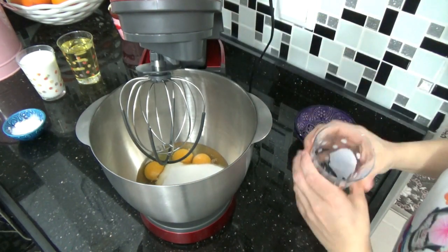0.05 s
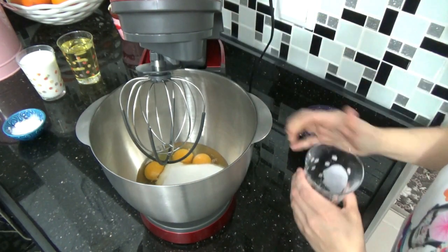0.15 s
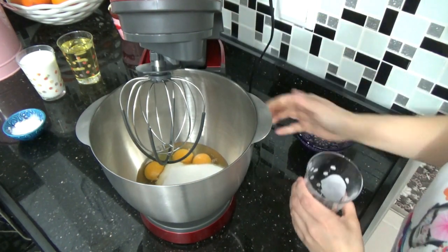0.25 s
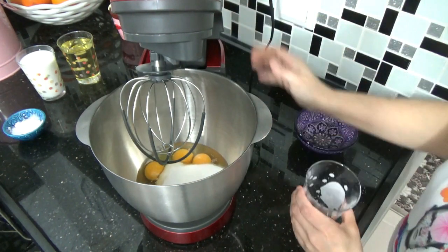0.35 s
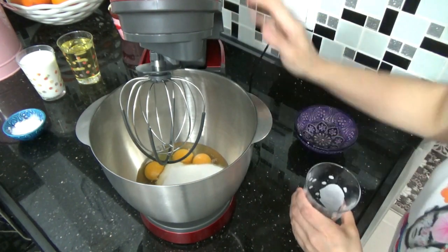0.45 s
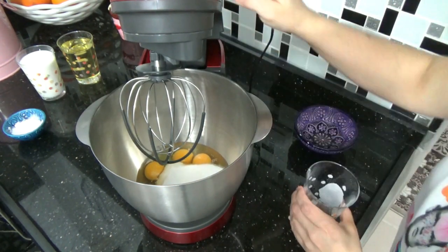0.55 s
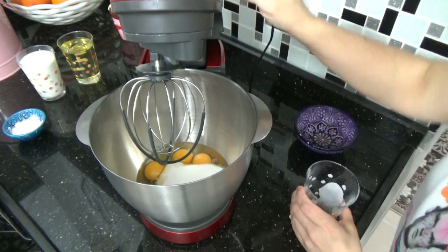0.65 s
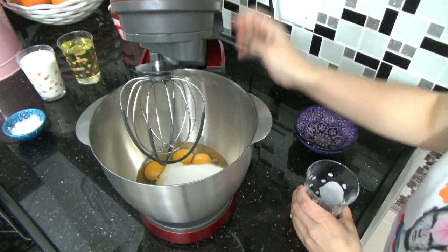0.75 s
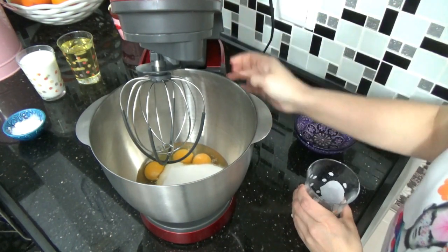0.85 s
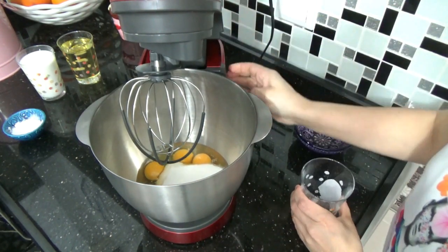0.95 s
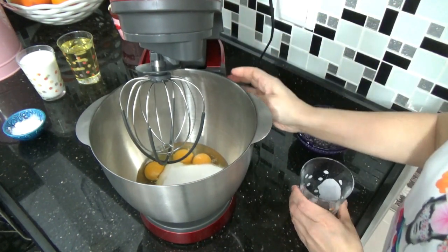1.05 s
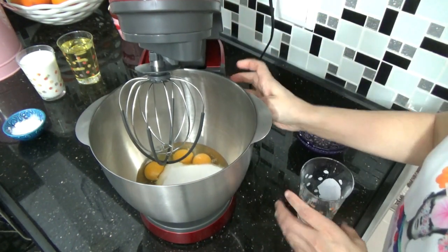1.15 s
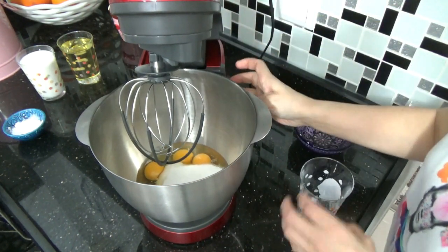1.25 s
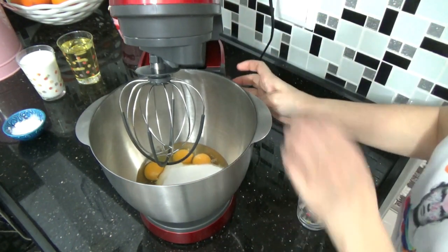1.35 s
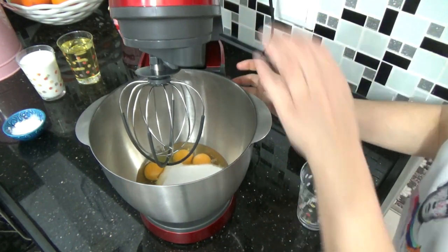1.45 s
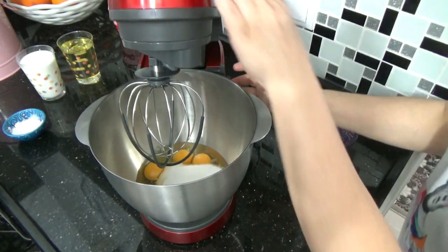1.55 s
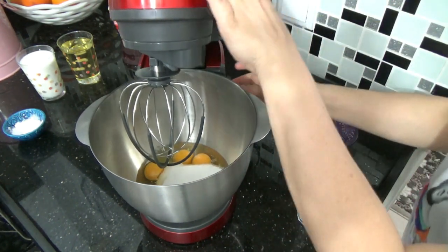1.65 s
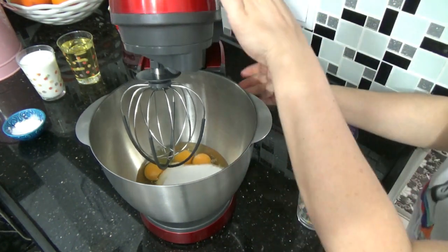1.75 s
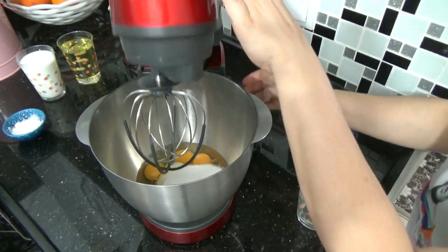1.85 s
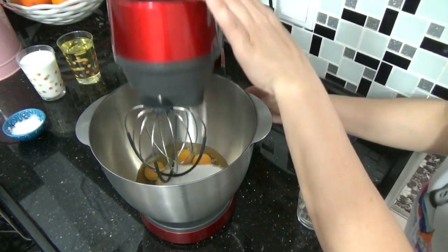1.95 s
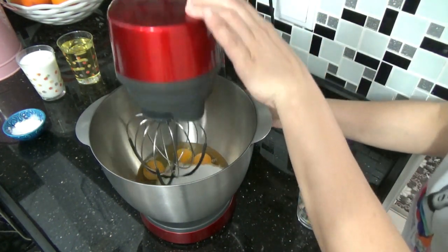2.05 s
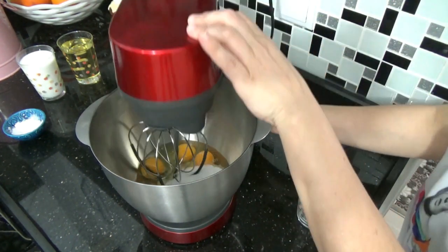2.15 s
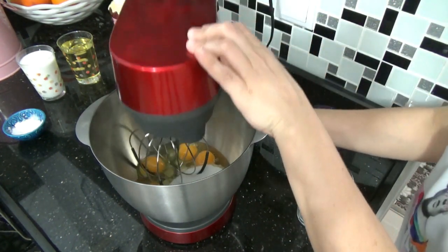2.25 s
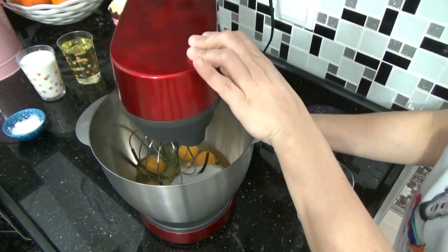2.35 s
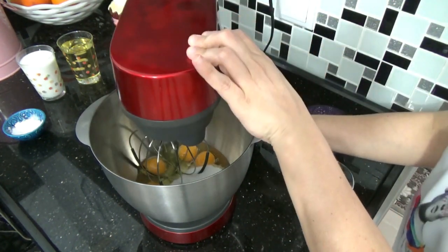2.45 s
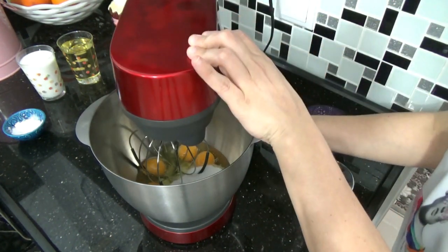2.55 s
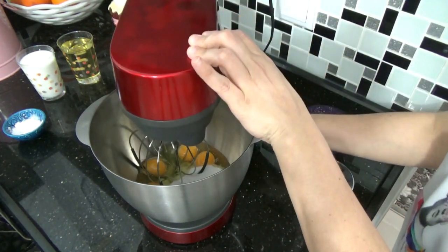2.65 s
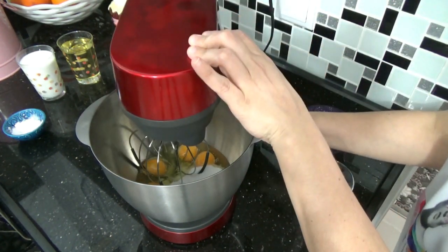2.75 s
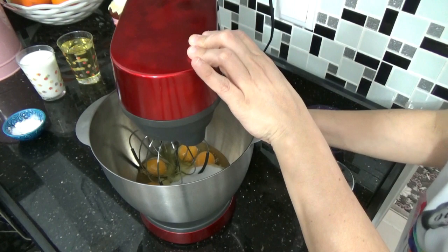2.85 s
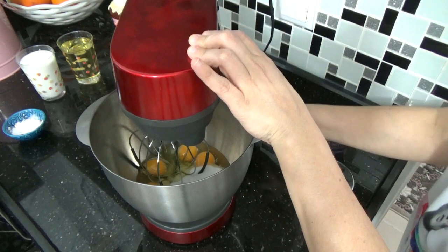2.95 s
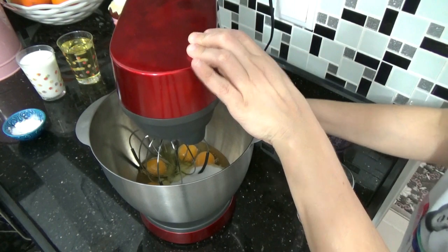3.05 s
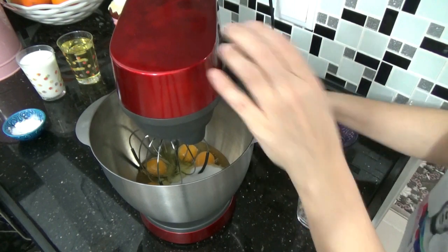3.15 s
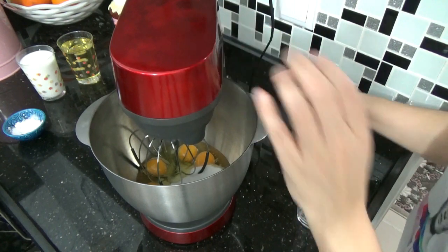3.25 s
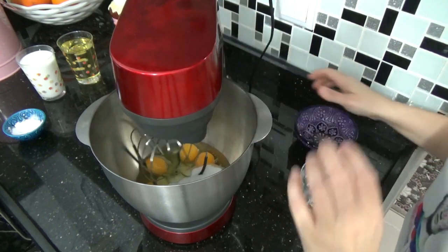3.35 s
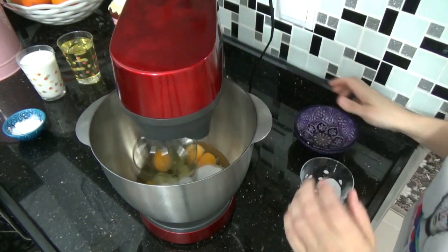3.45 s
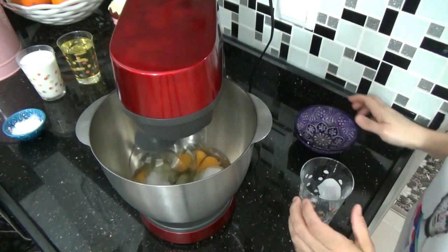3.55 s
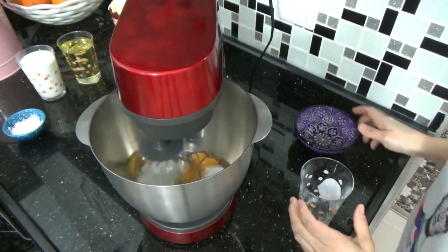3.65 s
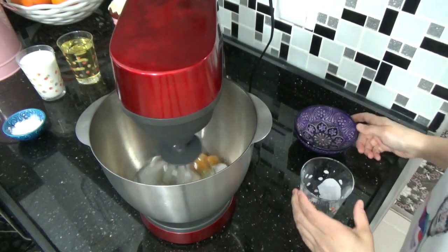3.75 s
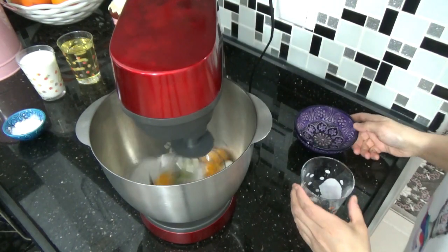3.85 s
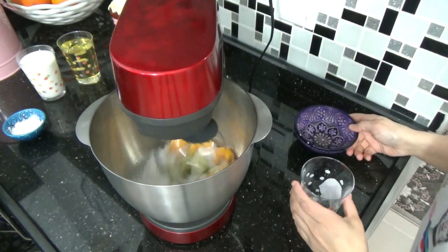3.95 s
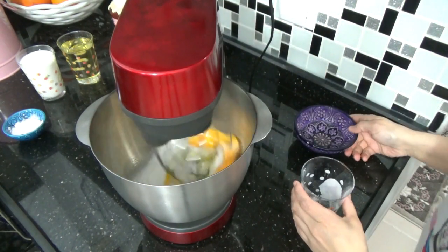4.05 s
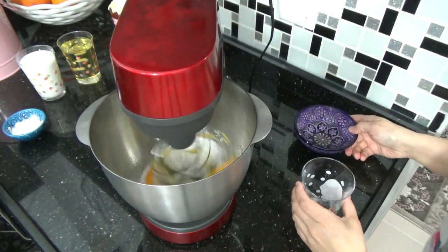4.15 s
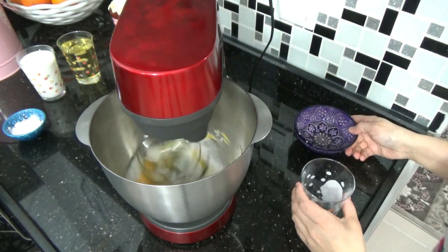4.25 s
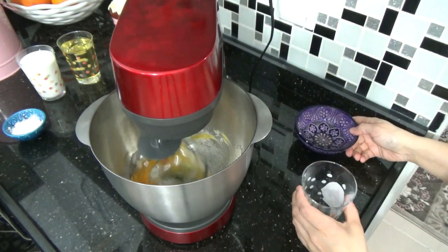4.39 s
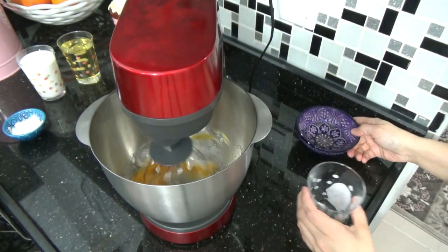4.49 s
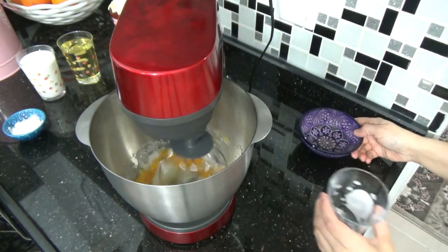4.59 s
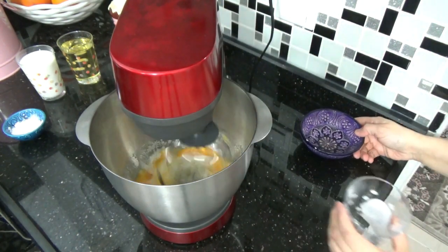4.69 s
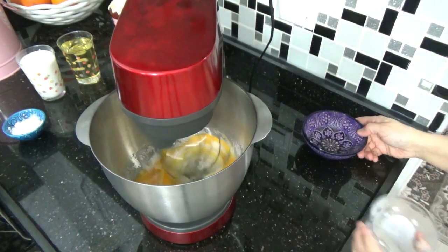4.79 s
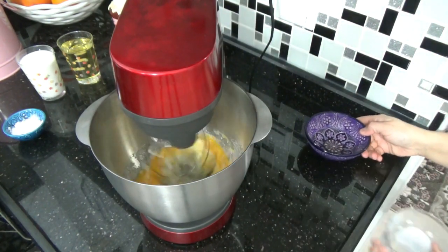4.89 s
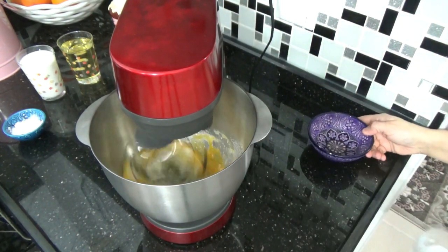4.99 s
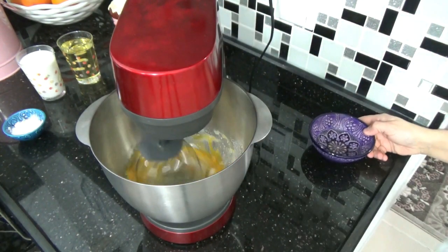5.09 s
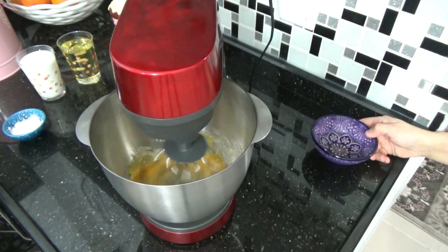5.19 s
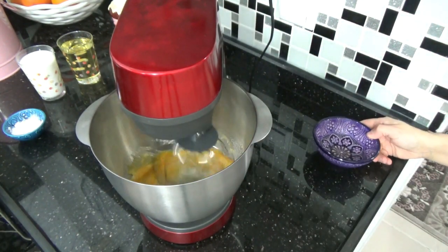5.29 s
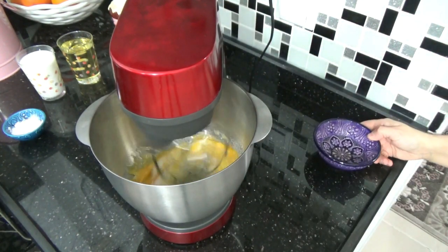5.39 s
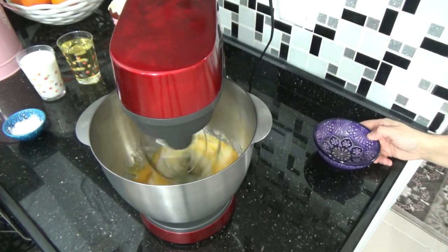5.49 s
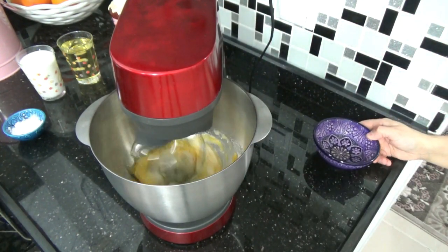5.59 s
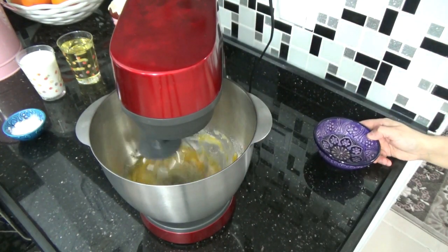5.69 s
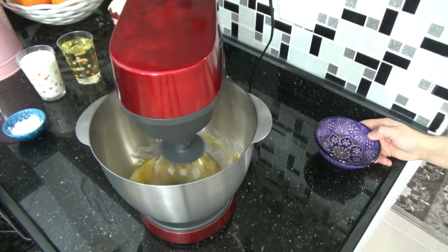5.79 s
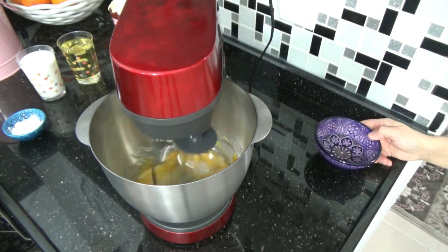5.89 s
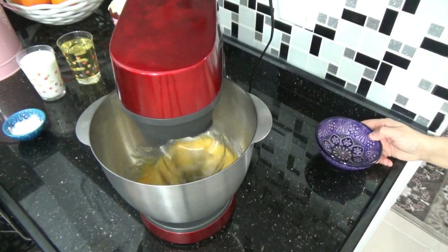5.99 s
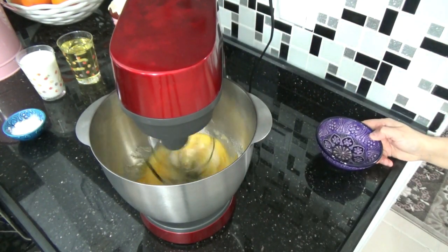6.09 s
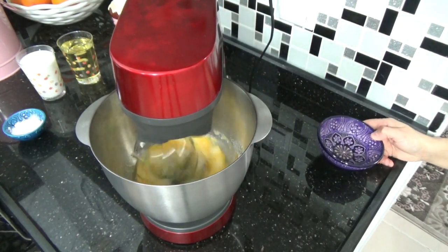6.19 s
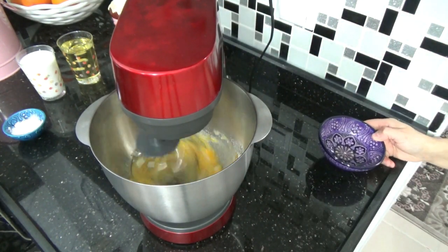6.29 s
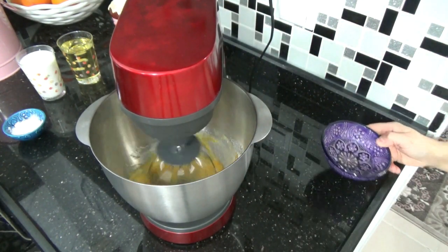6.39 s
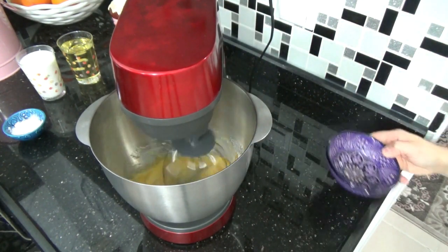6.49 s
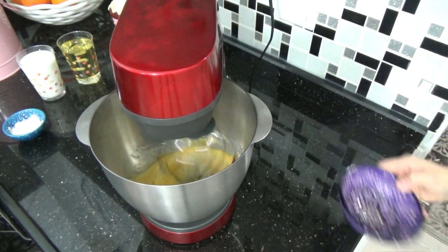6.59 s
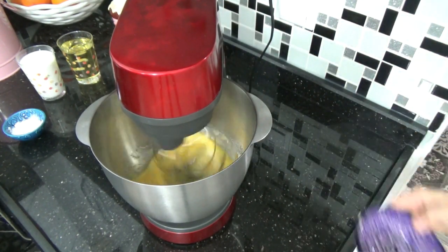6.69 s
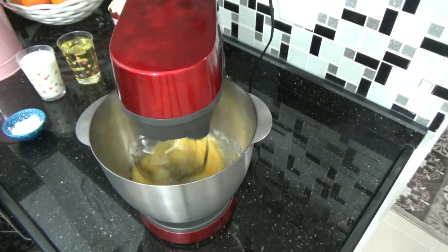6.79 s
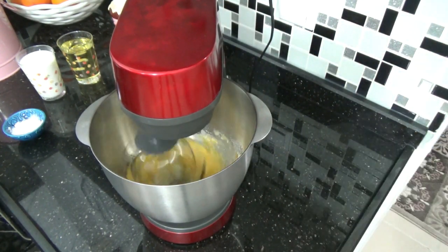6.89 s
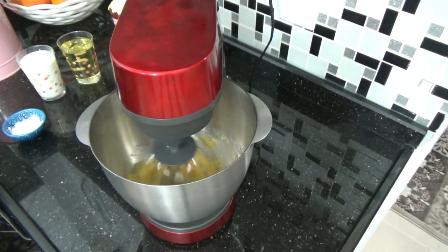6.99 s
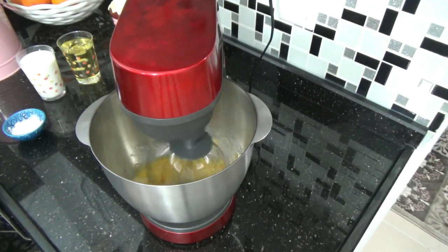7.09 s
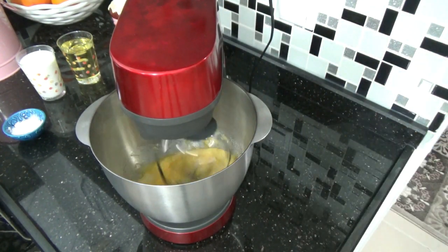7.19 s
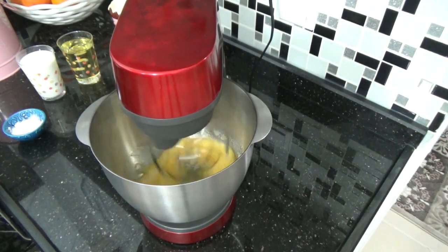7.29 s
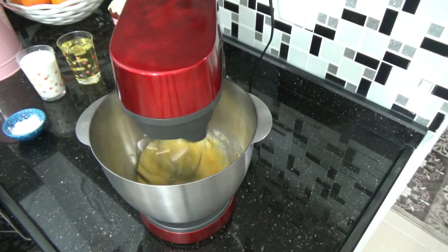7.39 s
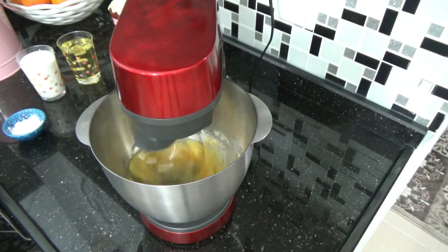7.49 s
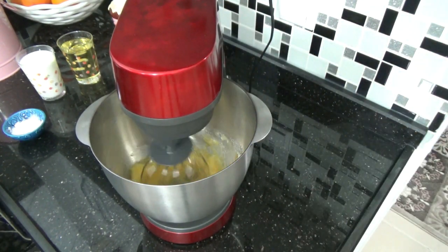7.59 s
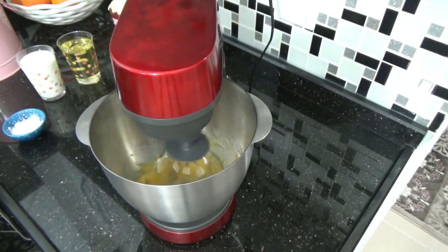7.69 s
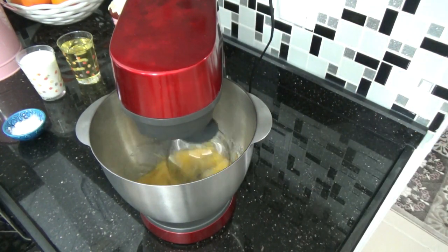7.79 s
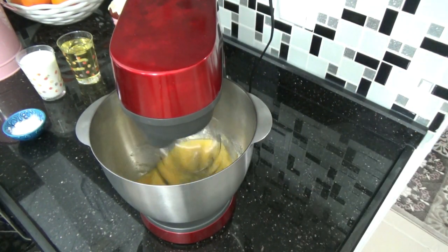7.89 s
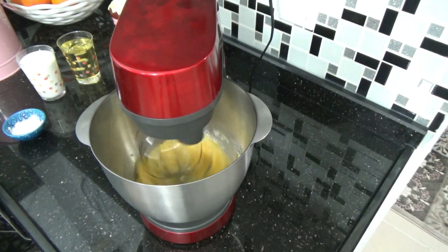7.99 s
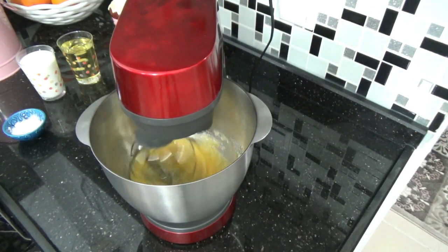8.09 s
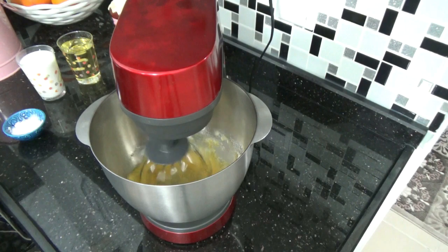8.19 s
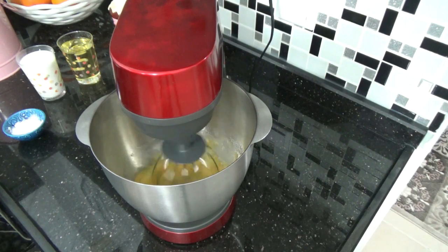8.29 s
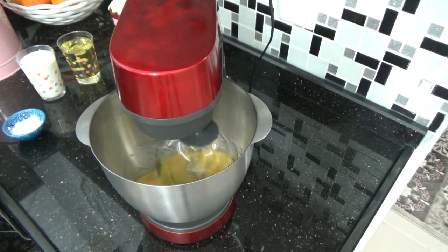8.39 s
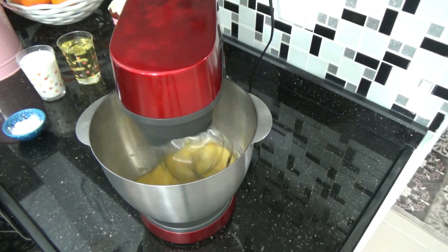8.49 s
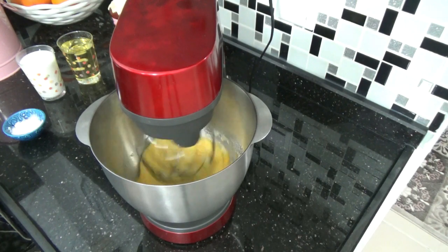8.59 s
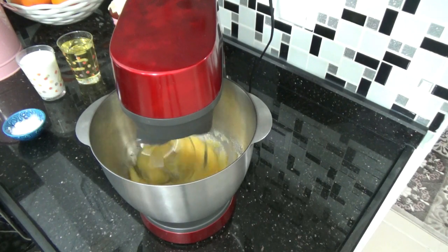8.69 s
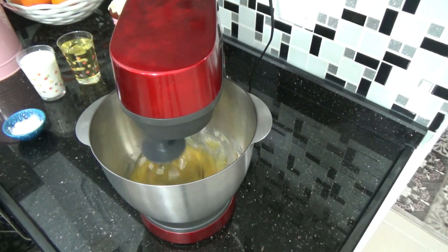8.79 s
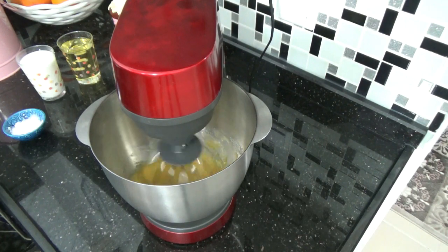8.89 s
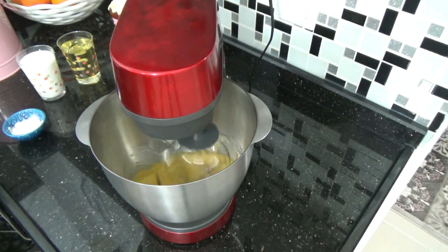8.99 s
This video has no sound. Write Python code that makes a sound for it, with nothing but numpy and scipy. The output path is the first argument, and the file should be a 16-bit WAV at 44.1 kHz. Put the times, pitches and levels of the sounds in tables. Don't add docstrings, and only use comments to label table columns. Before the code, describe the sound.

In a tiled kitchen, a mixer head is rapped, latched and dropped, then its geared motor surges up and whines on continuously, whisk crunching sugar at first.

```python
import sys
import numpy as np
from scipy import signal
from scipy.fft import rfft, irfft, next_fast_len
from scipy.io import wavfile
from scipy.ndimage import uniform_filter1d, map_coordinates

SR = 44100
rng = np.random.default_rng(int(sys.argv[2]) if len(sys.argv) > 2 else 0)


def natural_amplitude(level_db):
    exponent = np.asarray(level_db, float) / 20
    return 10 ** exponent


def file_out(sig):
    cols = np.atleast_2d(sig).T
    lim = np.clip(cols, -1, 1)
    pcm = np.round(lim * 32767).astype(np.int16)
    wavfile.write(sys.argv[1], SR, pcm)


N = 398663
NOW = np.arange(N) / SR
MAINS_HZ = 50
PLANET, WHEEL = 10 / 11, .13
OPPOSITE = np.array([[1], [-1]])


def unit(x):
    return x / np.sqrt(np.mean(x ** 2) + 1e-20)


def along(points, hz):
    f, v = np.transpose(points)
    return np.interp(np.log(hz + 1), np.log(f + 1), v)


def curve(rows):
    s, value = np.transpose(rows)
    return np.interp(NOW, s, value)


def wobble(rate):
    knots = rng.standard_normal(int(N * rate / SR) + 4)
    return map_coordinates(knots, [np.arange(N) * rate / SR], order=1)


def filtered(x, response):
    m = next_fast_len(x.shape[-1] + 8192)
    return irfft(rfft(x, m) * response(np.fft.rfftfreq(m, 1 / SR)), m)[..., :x.shape[-1]]


def bump(hz, centre, width):
    return np.exp(-((hz - centre) / width) ** 2)


def rush(spectrum, alike, patchy_db):
    z = signal.stft(rng.standard_normal((2, N)), nperseg=512)[2]
    field = uniform_filter1d(rng.standard_normal(z.shape[1:]), 5, 0)
    patches = natural_amplitude(patchy_db * unit(uniform_filter1d(field, 12, 1)))
    pair = signal.istft(z * patches, nperseg=512)[1][:, :N]

    def spread(hz):
        turn = np.arccos(np.clip(along(alike, hz), -1, 1)) / 2
        return natural_amplitude(along([(0.8, -120)] + spectrum, hz)) * [np.cos(turn), np.sin(turn)]

    mid, side = filtered(pair, spread)
    return unit(np.array([mid + side, mid - side]))


def tone(angle, db, drift_db, rate):
    shift = rng.normal(0, 0.16) * OPPOSITE
    level = natural_amplitude(db + drift_db * wobble(rate))
    return np.sqrt(2) * level * np.sin(angle + rng.uniform(0, 2 * np.pi) + shift)


def humps(rows):
    return sum(natural_amplitude(db) * np.exp(-((NOW - s) / length) ** 2) for s, db, length in rows)


# f/Hz, left-right likeness
ALIKE = [(60, 0.2), (150, 0.99), (380, 0.83), (950, 0.74), (2380, 0.83), (5980, 0.97), (15000, 0.79)]


def swells(rows, spectrum, grain_db, patchy_db):
    return humps(rows) * natural_amplitude(grain_db * wobble(300)) * rush(spectrum, ALIKE, patchy_db)


def ringing(modes, t):
    modes_sum = sum(natural_amplitude(level + rng.normal(0, 1.9) - 60 * t / life) * np.sin(2 * np.pi * hz * t)
                    for hz, level, life in modes)
    return modes_sum * (1 - np.exp(-t / 0.00075))


# f/Hz, left over right level/dB
LEAN = [(60, 12), (180, -2.5), (550, -0.5), (1650, -1.0), (4970, -1), (15000, 1.5)]


def mixer():
    dial, shaft = spin()
    whole = commutator(dial, shaft) + gears(dial, shaft) + gear_roar(dial, shaft)
    whole = whole + brushes(dial, shaft) + motor_hum(dial)
    whole = whole - 0.34 * facing(dial, 0) * filtered(whole, lambda hz: bump(hz, 2750, 380))
    running = np.clip((NOW - SPEED[0][0]) / .004, 0, 1)
    both = running * np.array([whole, pinion_whine(dial, shaft)])
    return filtered(both, lambda hz: natural_amplitude(along(LEAN, hz) / 2 * OPPOSITE))


# t/s, shaft speed/turns per s
SPEED = [(3.34, 24.3), (3.47, 64.2), (3.54, 73.8), (3.68, 100.9), (3.75, 106.5), (3.82, 107.9),
         (4.01, 105.3), (4.13, 105.1), (4.24, 106.5), (4.47, 112.6), (4.7, 120.6), (4.93, 131.2),
         (5.05, 134.9), (5.16, 137.1), (5.62, 136.7), (5.9, 134.5), (6.95, 135.2), (9.04, 134.95)]


def spin():
    dial = uniform_filter1d(curve(SPEED), size=SR // 16)
    speed = dial + .17 * facing(dial, .2)
    strain = np.clip(np.gradient(dial) * SR / 30, 0, 3)
    shake = (.0007 + .0026 * strain) * wobble(40)
    return dial, 2 * np.pi * np.cumsum(speed * (1 + shake)) / SR


def facing(dial, share, count=1):
    laps = .01206 * np.cumsum(dial) / SR
    return np.cos(2 * np.pi * count * (laps - laps[8 * SR] - share))


def song(dial):
    return 45 * np.log10(dial / dial[-1])


def swell(dial, db, swing_db, share, count=1):
    return db + swing_db * natural_amplitude(2 * song(dial)) * facing(dial, share, count)


def roar_level(dial, db, knee_db, slope):
    return natural_amplitude(db + slope * np.minimum(0, song(dial) + knee_db))


# f/Hz, level/dB
BODY = [(190, -12), (250, 0), (780, -3), (940, 1), (1090, -6), (1180, -3), (1230, -2), (1600, 0),
        (3800, -2), (4250, -7), (4600, 4), (4860, 0), (5200, -6), (5750, 1), (6480, 0), (7600, -4),
        (8600, 4), (9700, 0), (10300, 2), (11400, -5), (13000, -11)]


def casing(dial, order):
    return along(BODY, order * dial) - along(BODY, order * dial[-1])


def mains_ripple():
    return np.cos(4 * np.pi * MAINS_HZ * NOW)


# f/Hz, level/dB
PINION_CASE = [(700, -40), (1150, -24), (1300, -12), (1365, 0), (1400, 4), (1445, -5), (1500, -11),
               (1600, -10), (1700, -2.5), (1750, .5), (1785, -1.5)]
# order, level/dB, swing/dB, share of the lap at the loudest
PINION_SIDES = [(12.77, -34, 4, 0.44), (13.18, -38.5, -5, 0.31)]


def pinion_whine(dial, shaft):
    tooth = 13
    depth = 0.2 - 0.033 * np.clip(song(dial), -6, 0)
    runout = 1 + depth * np.cos(WHEEL * shaft + wobble(7.4))
    level = swell(dial, -24.5, 3.8, .98) + along(PINION_CASE, tooth * dial)
    whine = runout * tone(tooth * shaft, level, drift_db=.8, rate=9)
    for order, *row in PINION_SIDES:
        whine = whine + tone(order * shaft, swell(dial, *row) + 0.51 * song(dial), drift_db=2.5, rate=12)
    return whine


# overtone, level/dB
SPARKS = [(1, -40), (3, -40), (4, -37), (6, -41), (7, -44.5), (8, -49), (9, -68)]
# f/Hz, level/dB
SECOND_CASE = [(1700, -22), (2000, 3), (2300, 4), (2480, -12), (2600, -7), (2850, -7), (3100, .5),
               (3245, 0), (3285, -9)]


def commutator(dial, shaft):
    bars, load_db, ripple = 12, song(dial), mains_ripple()
    sparks = 0
    for k, db in SPARKS:
        level = db + .5 * load_db + 1.5 * np.minimum(0, load_db + 6) + casing(dial, k * bars)
        sparks = sparks + tone(k * bars * shaft, level, drift_db=3, rate=22)
    second = swell(dial, -32, 2.5, .25) + along(SECOND_CASE, 2 * bars * dial)
    sparks = sparks + tone(2 * bars * shaft + .6 * ripple, second, drift_db=1.8, rate=15)
    fifth = swell(dial, -31.5, 1.5, .47, count=2) + 1.7 * load_db
    sparks = sparks + tone(5 * bars * shaft + 0.15 * ripple, fifth, drift_db=1.8, rate=15)
    uneven = 1 + (.2 - .06 * np.clip(load_db, -6, 0)) * np.cos(shaft)
    return (uneven + .1 * ripple + .2 * np.cos(WHEEL * shaft)) * sparks


# overtone, level/dB, swing/dB, share of the lap at the loudest
MESH = [(2, -39, 3.5, 0.69), (5, -34.5, 3.5, 0.77), (6, -33, 3.5, 0.58), (8, -35, 1, 0.24),
        (10, -36, 4, 0.59), (11, -43, 6, 0.26), (17, -39.5, 3, 0.47), (19, -43, 1.5, .3), (20, -55, 0, .3)]
# order, level/dB
STRAYS = [(2.08, -39), (3.22, -39.5), (3.42, -42.5), (13.48, -41.5), (14.22, -46), (26.12, -43)]
# order, level/dB
SLOW_ORDERS = [(2.73, -34), (5.45, -40), (7.27, -40), (9.09, -36.5), (10, -36), (16.1, -39), (56, -48),
               (64, -48), (68, -49), (83, -48), (88, -47), (92, -50), (95, -50)]


def gears(dial, shaft):
    load_db = song(dial)
    whine = 0
    for k, *row in MESH:
        growth = 2.4 if k < 9 else 0.89
        level = swell(dial, *row) + growth * load_db + casing(dial, k * PLANET)
        whine = whine + tone(k * PLANET * shaft, level, drift_db=2.2, rate=14)
    for k, db in STRAYS:
        whine = whine + tone(k * shaft, db + 3.7 * load_db + casing(dial, k), drift_db=3.5, rate=14)
    looseness_db = -3 * ((dial - 113) / 11) ** 2
    for k, db in SLOW_ORDERS:
        whine = whine + tone(k * shaft, db + looseness_db, drift_db=4.5, rate=16)
    idler = 11.17
    idler_db = -28.5 - 3 * ((idler * dial - 1215) / 45) ** 2
    return whine + tone(idler * shaft, idler_db, drift_db=6.5, rate=30)


# f/Hz, level/dB per Hz
GEARBOX = [(210, -14.5), (350, -15.5), (442, -5), (552, -19.5), (617, -1.5), (675, -3), (1520, -4),
           (1760, -3.5), (1920, -5), (2830, -13), (3240, -13.5), (3830, -19.5), (5000, -20), (6500, -19.5),
           (11000, -120)]
# f/Hz, level/dB per Hz
HOUSING = [(41, -60), (70, -22), (91, -24), (198, -20.5), (248, 5), (307, -2), (438, -5), (560, -6),
           (614, -9), (745, -39), (800, -8), (1040, -4), (1760, -120)]
# t/s, level/dB
PRESSURE = [(3.65, -1.5), (3.9, -1), (4.04, 2), (4.12, -3), (4.16, -3), (4.3, -2), (4.4, 1), (4.9, 1.3),
            (9.04, 1)]


def gear_roar(dial, shaft):
    meshing = 1 + 0.12 * np.cos(PLANET * shaft)
    bearing = natural_amplitude(curve(PRESSURE) + 0.35 * wobble(6))
    gearbox = roar_level(dial, -20, knee_db=9.6, slope=1.26) * bearing * rush(GEARBOX, ALIKE, patchy_db=1.68)
    housing = roar_level(dial, -29.5, knee_db=11, slope=1.1) * rush(HOUSING, ALIKE, patchy_db=-0.6)
    return meshing * (gearbox + housing)


# f/Hz, level/dB per Hz
BRUSH = [(1470, -6.5), (2500, -8.5), (2890, -13), (3230, -4.5), (3820, -10.5), (4710, -8), (5210, -11.5),
         (8400, -3), (8870, -3), (13300, -18), (15800, -25)]


def brushes(dial, shaft):
    turn = rng.standard_normal(256)
    chatter = np.interp(shaft / (2 * np.pi) % 1 * 256, np.arange(256), turn, period=256)
    chatter = filtered(chatter * natural_amplitude(2.8 * wobble(13)),
                       lambda hz: natural_amplitude(along(BRUSH, hz) + 2.7 * bump(hz, 8000, 2500)))
    hiss = (1 + .17 * np.cos(shaft) + .1 * mains_ripple()) * rush(BRUSH, ALIKE, patchy_db=1)
    level = roar_level(dial, -27.5, knee_db=11, slope=1.4) * natural_amplitude(0.11 * song(dial))
    return level * (hiss + natural_amplitude(-6.5) * unit(chatter))


def motor_hum(dial):
    load_db = song(dial)
    level = -59 - np.clip(load_db, -5, 0) + .6 * np.minimum(0, load_db + 8)
    return tone(2 * np.pi * 2 * MAINS_HZ * NOW, level, drift_db=2.5, rate=8)


# f/Hz, level/dB, t60/s
HEAD = [(317, -13, .2), (775, -4, .2), (813, -4, .3), (844, -4, .3), (864, -9, .25), (1087, -6, .12),
        (1159, -9, .14), (1745, -8, .09), (2110, -10, .1), (2300, -8, .07), (3280, -6, .05),
        (3750, -8, .05), (4550, -14, .035)]
# f/Hz, level/dB, t60/s
CAP = [(7500, -17, .04), (8180, -14, .045), (8450, -18, .03)]
# f/Hz, level/dB, t60/s
BASE = [(345, 1, .12), (660, -2, 0.19), (767, -1.5, 0.11), (918, 4, 0.11), (1068, 0, .12), (1184, -10, .12),
        (1650, -13, 0.055), (1950, -16, .06), (2100, -14, 0.069), (2860, -28, 0.046)]


def knocks():
    out, t = np.zeros(N + SR), np.arange(SR // 3) / SR
    for i, (s, db, *touch) in enumerate(contacts()):
        sound = burst(t, *touch)
        if i < len(RAPS):
            ring_db, cap_db = RAPS[i][-2:]
            sound = 0.56 * sound + natural_amplitude(ring_db) * (ringing(HEAD, t) + natural_amplitude(cap_db) * ringing(CAP, t))
        elif i >= len(RAPS) + len(CLICKS):
            sound = 0.86 * sound + natural_amplitude(-16) * ringing(BASE, t)
        out[round(s * SR):][:len(t)] += natural_amplitude(db) * sound
    return out[:N] + slam()


def burst(t, thud_db, clack_db, tick_db, t60):
    colour = [(130, thud_db - 10), (300, thud_db + 12.5), (480, 0.33 * thud_db + 1.5), (800, 0.39),
              (1300, -0.48), (3300, clack_db - 3.0), (6200, tick_db - 9.0), (8500, tick_db - 7.5),
              (11000, tick_db - 18.5), (15000, tick_db - 30)]
    noise = filtered(rng.standard_normal(len(t)), lambda hz: natural_amplitude(along(colour, hz)))
    onset = 1 - np.exp(-t / (.0006 + 0.00039 * natural_amplitude(-.6 * tick_db)))
    return natural_amplitude(8.0) * noise * natural_amplitude(-60 * t / np.clip(t60, .01, .4)) * onset


# t/s, peak level/dB, tick/dB, ring/dB, cap/dB (the last three relative)
RAPS = [
    (0.801, -7.5, -11, -13, 10),
    (0.827, -7, -24, -20, 6),
    (1.004, -7.5, -10, -10.5, -6),
]
# t/s, peak level/dB, relative tick/dB, t60/s
CLICKS = [(1.163, -17.5, -1.5, 0.041), (2.262, -23.5, 11, 0.044), (2.298, -30, 6, 0.07),
          (2.316, -24.5, 11.5, 0.091), (2.333, -13, 0, 0.073), (2.362, -27, 10, .05),
          (2.603, -35, 3, 0.047), (2.634, -37.5, -5, 0.076), (2.684, -33.5, -7, 0.037),
          (2.832, -36.5, 7, 0.041), (2.844, -37, 3.5, 0.051)]
# t/s, peak level/dB, relative thud/dB, relative clack/dB
BUMPS = [(1.274, -29, -1, -27), (1.36, -29.5, -4, -14), (1.373, -24, -16, -25), (1.535, -36, 8, -15),
         (1.553, -25.5, -15, -12), (1.574, -31.5, 7, -6), (1.685, -30, -8, -20), (1.692, -14, -14, -5.5),
         (1.699, -12, -5, -16.5), (1.714, -22, -1, -28), (1.744, -25, -8, -26), (1.791, -28, 5, -27),
         (1.921, -32, -13, -10), (2.742, -34, -16, -18), (2.845, -32.5, 4, -4), (2.921, -34, -17, -8),
         (2.957, -25, -4, -7), (3.068, -16, -15, -9.5), (3.078, -19.5, -13, -12), (3.087, -23.5, -10, -25),
         (3.341, -28, -5, 0), (3.357, -30, -1, -12)]


def contacts():
    raps = [(s, db, -20, 9 + 0.33 * tick, tick, 0.059) for s, db, tick, *_ in RAPS]
    clicks = [(s, db, -10.5, -1 + 0.33 * tick, tick, t60) for s, db, tick, t60 in CLICKS]
    bumps = [(s, db, thud, clack, clack - 8, 0.054) for s, db, thud, clack in BUMPS]
    return raps + clicks + bumps


# t/s, level/dB
SLAM = [
    (2.33, -27),
    (2.336, -17),
    (2.412, -17),
    (2.47, -31),
]
# f/Hz, level/dB per Hz
SHUDDER = [(59, -60), (100, -25), (304, -9), (337, -8), (558, -9), (748, -3), (849, -10), (1190, -7.5),
           (1770, -13.5), (8000, -31.5), (15000, -48)]


def slam():
    level = natural_amplitude(curve(SLAM) - 2.5 + 2.4 * wobble(120))
    fade = natural_amplitude(-500 * np.clip(NOW - SLAM[-1][0], 0, 1))
    return level * (NOW > SLAM[0][0]) * fade * rush(SHUDDER, ALIKE, patchy_db=1.5)[0]


# t/s, level/dB, length/s
SCRAPES = [(.04, -59, .02), (0.092, -55, .025), (0.152, -54, 0.027), (1.08, -50, .05), (2.065, -58, 0.049),
           (3.191, -53, .0025), (3.428, -32, 0.01), (3.483, -20, 0.02), (3.526, -22.5, 0.0091),
           (3.568, -23, 0.0086), (3.678, -21, 0.027), (3.776, -25, 0.016), (3.85, -32, .015),
           (4.02, -29, .012), (4.13, -23, 0.022), (4.61, -29, .022)]
# f/Hz, level/dB per Hz
SUGAR = [(2600, -32), (4000, -5), (5000, -11.5), (6500, -9.5), (8300, -1), (9500, -7), (12000, -22),
         (15500, -29)]
# t/s, level/dB, length/s
BUZZ = [
    (3.37, -44, 0.027),
    (3.49, -25.5, 0.027),
    (3.535, -32, 0.013),
    (3.585, -20.5, .035),
    (3.99, -29, 0.046),
]
# f/Hz, level/dB per Hz
PANEL = [(850, -26), (1090, 2), (1350, -20), (1900, -17), (2200, -3), (2450, -8), (3000, -28), (5000, -87)]
# t/s, level/dB, length/s
GROWL = [
    (3.36, -28.5, 0.014),
    (3.41, -28, 0.035),
    (3.47, -27, 0.039),
    (3.53, -28.5, .025),
]
# f/Hz, level/dB per Hz
FRAME = [(200, -22), (360, -10), (470, -2), (640, -2), (800, -13), (1150, -10), (1450, -22), (3000, -70)]


def sugar():
    crunch = swells(SCRAPES, SUGAR, grain_db=4.0, patchy_db=5.5)
    buzz = swells(BUZZ, PANEL, grain_db=4, patchy_db=4.0)
    return crunch + buzz + swells(GROWL, FRAME, grain_db=2.5, patchy_db=0.5)


# f/Hz, t60/s
KITCHEN = [(200, 0.5), (1000, 0.48), (4000, 0.3), (10000, 0.17)]


def kitchen(x, step):
    out = np.zeros((2, 2 * N + SR))
    for start in range(0, len(x), step):
        hz, t, z = signal.stft(rng.standard_normal((3, SR // 2)), SR, nperseg=256)
        tail = signal.istft(z * natural_amplitude(-60 * t / along(KITCHEN, hz)[:, None]), SR, nperseg=256)[1]
        tail = tail[0] + 0.51 * tail[1:]
        wet = signal.fftconvolve(x[None, start:start + step], tail / np.linalg.norm(tail[0]), axes=1)
        out[:, start + 200:][:, :wet.shape[1]] += wet
    return out[:, :N]


# t/s, level/dB, length/s
HANDS = [(0.05, -57, 0.18), (0.88, -49, 0.036), (1.08, -39, 0.074), (1.6, -51, 0.58), (2.15, -46.5, 0.28),
         (2.43, -39, 0.12), (2.95, -48, 0.19), (3.4, -51, 0.25)]
# f/Hz, level/dB per Hz
AIR = [(44, -43), (75, -5.5), (117, -15), (134, -6.5), (154, -7.5), (172, -14), (201, -3), (321, -6.5),
       (481, -7.5), (2470, -22.5), (3160, -24), (14500, -38), (15800, -43)]
# f/Hz, left-right likeness
AIR_ALIKE = [(60, 0.93), (240, 1), (950, 0.88), (3770, 0.64), (15000, 0.8)]
# f/Hz, level/dB per Hz
RUMBLE = [(20, 4), (60, -7), (100, -25), (300, -90)]


def room_tone():
    air = (natural_amplitude(-46) + humps(HANDS)) * natural_amplitude(wobble(7.16) - 5.0) * rush(AIR, AIR_ALIKE, patchy_db=1.0)
    hum = natural_amplitude([[-56.5], [-58]] + 3 * wobble(7)) * np.sin(2 * np.pi * MAINS_HZ * NOW)
    rumble = natural_amplitude(-65 + 4 * wobble(6)) * rush(RUMBLE, [(30, .2)], patchy_db=2)
    return air + focus_tick() + hum + rumble


def focus_tick():
    since = (NOW - .0012) % .04
    strong = np.where((NOW - .0012) % .08 < .04, 1, .45)
    tick = strong * natural_amplitude(-60 * since / .012) * rng.standard_normal(N)
    return natural_amplitude(-67) * unit(filtered(tick, lambda hz: bump(hz, 3300, 650)))


def scene():
    hits = filtered(knocks(), lambda hz: hz ** 4 / (hz ** 4 + 170 ** 4))
    motor, pinion = mixer()
    echoes = natural_amplitude(-4.0) * kitchen(hits[:4 * SR], SR // 3)
    standing = natural_amplitude(-14) * kitchen(motor.mean(0), N)
    machine = natural_amplitude(-0.12) * (motor + pinion + standing)
    return (hits + echoes) * natural_amplitude([[-.4], [.4]]) + machine + sugar() + room_tone()


def low_pass(x):
    return signal.sosfilt(signal.butter(12, 15800, fs=SR, output="sos"), x)


def record(dry):
    dry = dry / (1 + np.abs(dry / .72) ** 5) ** (1 / 5)
    dry = filtered(dry, lambda hz: (hz < 15850) * hz / (hz + 5))
    mid = (dry[0] + dry[1]) / 2
    side = filtered((dry[0] - dry[1]) / 2, lambda hz: 1 / (1 + (hz / 11800) ** 8))
    return low_pass(np.array([mid + side, mid - side]))


dry = scene()
out = record(dry)
file_out(out)
```